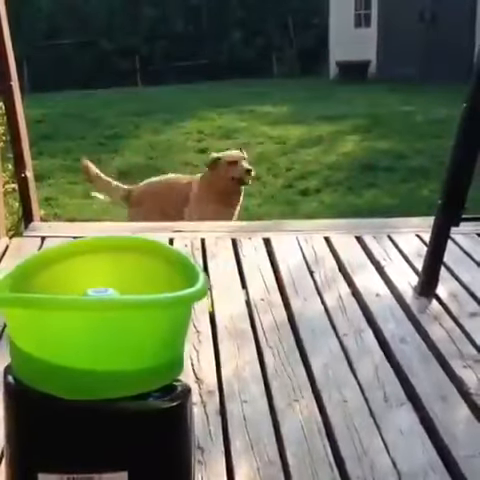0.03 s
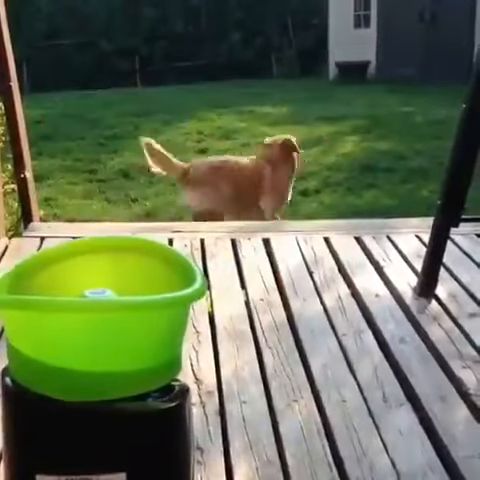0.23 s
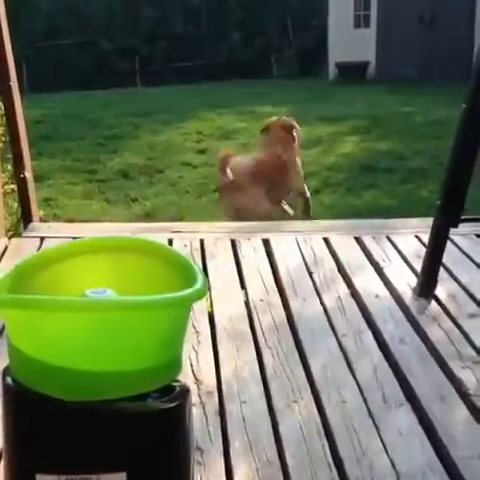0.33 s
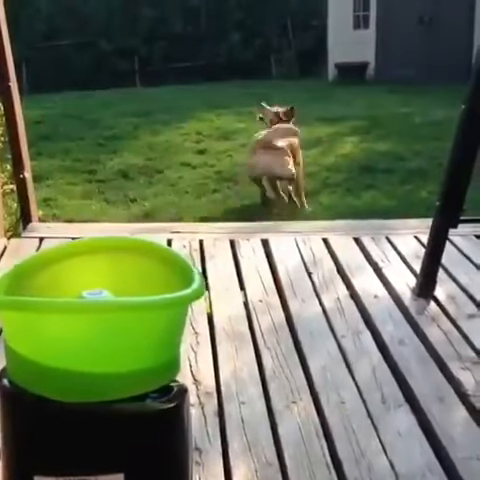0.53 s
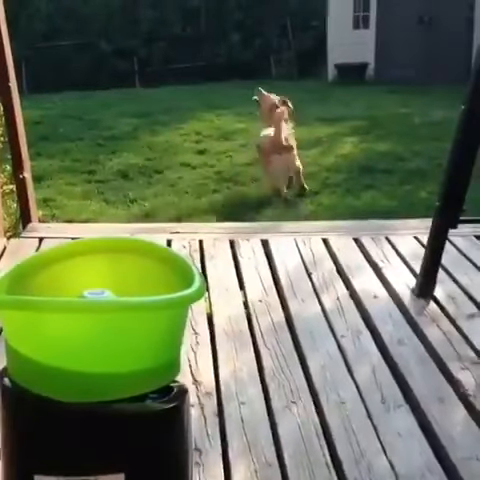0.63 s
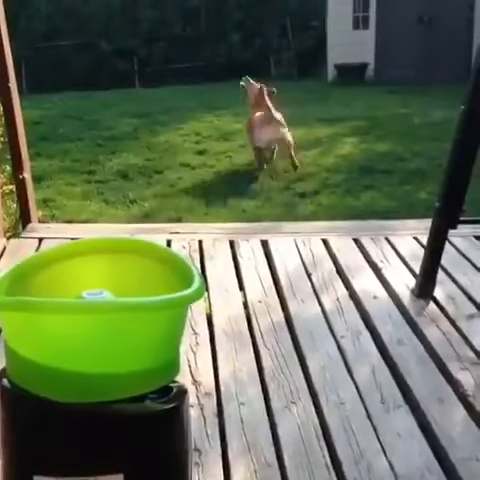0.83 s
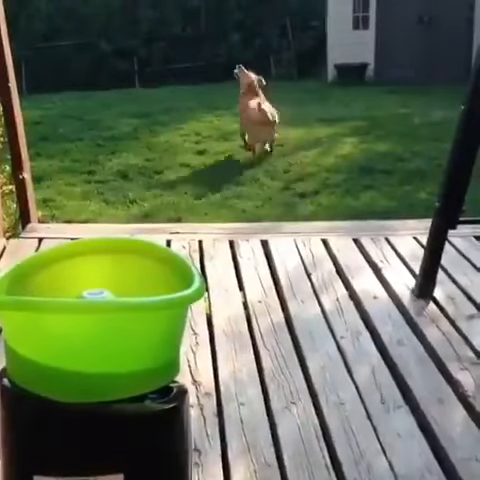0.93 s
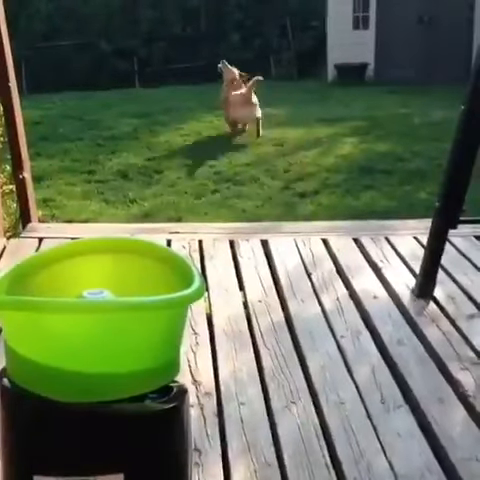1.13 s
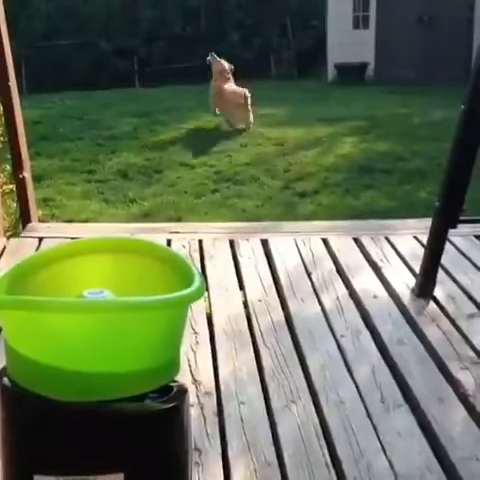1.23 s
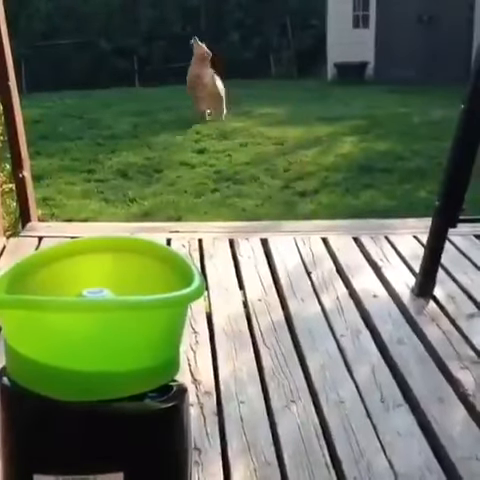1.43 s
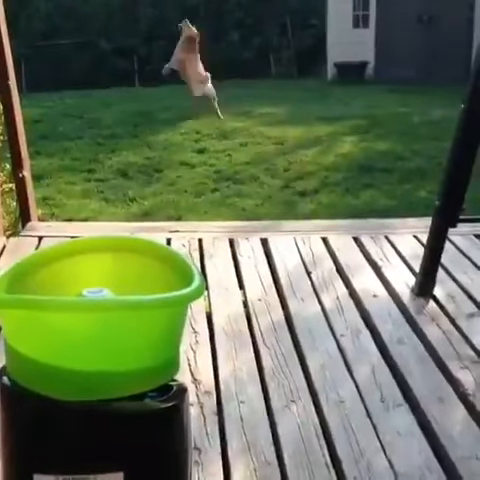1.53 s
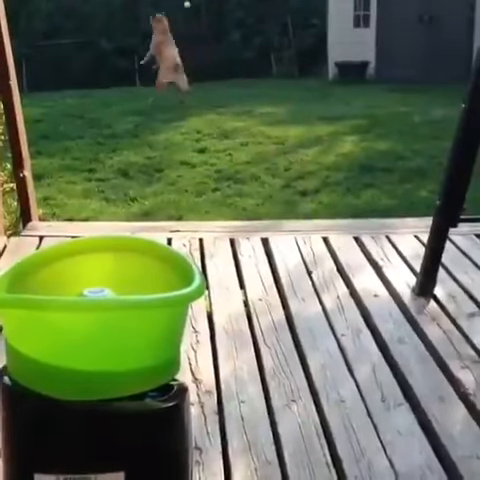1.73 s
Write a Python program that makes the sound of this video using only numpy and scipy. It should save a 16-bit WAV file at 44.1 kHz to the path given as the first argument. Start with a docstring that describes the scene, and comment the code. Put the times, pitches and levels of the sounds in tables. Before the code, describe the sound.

A ball launcher whines briefly, then fires with a loud, hollow plastic clack outdoors.

```python
"""A ball launcher on a wooden deck throws a ball for a dog in a quiet backyard.
Its motor whines as it cocks a spring; the latch slips and the striker clatters in the hollow plastic
housing, ringing the panels and booming the bucket. Deck and yard echo, the spring rings on faintly,
the mechanism rustles to rest and the dog runs off over the grass. Behind: rumble, hum, a far tone."""
import sys
import numpy as np
from scipy import signal
from scipy.fft import rfft, irfft
from scipy.io import wavfile

SR = 44100
rng = np.random.default_rng(int(sys.argv[2]) if len(sys.argv) > 2 else 0)


def file_out(sig):
    """Save sig as 16-bit WAV at sys.argv[1]."""
    # one column per channel
    cols = np.atleast_2d(sig).T
    # limit, then scale
    lim = np.clip(cols, -1, 1)
    pcm = np.round(lim * 32767).astype(np.int16)
    wavfile.write(sys.argv[1], SR, pcm)


N = 79380
T = np.arange(N) / SR

# Motor under load, then coasting. Each row: time in seconds, gear pitch in Hz, gain in dB.
MOTOR_RUN = [(0, 942, 1.5), (0.071, 936, -0.5), (.11, 952, -7.5), (0.199, 930, -12), (0.381, 833, -23),
             (.46, 728, -14), (.53, 680, -15), (0.659, 671, -16), (.74, 654, -26)]
# Gear whine. Each row: harmonic number, level in dB.
WHINE_HARMONICS = [(1, -53.5), (2, -55.5), (3, -49.5), (4, -58), (5, -58)]
# Gear rub. Each row: frequency in Hz, relative density in dB.
GEAR_SPECTRUM = [(60, -22.5), (200, 1.5), (500, -5.5), (950, 2), (1400, -5), (1900, 3), (2500, -6),
                 (5000, -1.5), (8000, -8.5), (12000, -10)]
# Outdoor rumble. Each row: frequency in Hz, relative density in dB.
YARD_SPECTRUM = [(25, -19.5), (48, 6.5), (100, -2), (130, -3), (210, -3), (280, -13), (370, -7),
                 (450, -10.5), (540, -19.5), (740, -13.5), (1000, -12.5), (1400, -16), (2600, -29.5),
                 (6600, -33.5), (12000, -36.5)]
# Background hum. Each row: frequency in Hz, level in dB.
HUM_TONES = [(119, -61), (350, -85), (452, -66.5)]
# Plastic panel clatter. Each row: frequency in Hz, relative density in dB.
CLATTER_SPECTRUM = [(30, -40), (70, -15), (130, -11), (330, -5), (800, -0.5), (1500, -0.5), (2200, -2.5),
                    (2700, -17.5), (4200, -12.5), (6500, -19.5), (11500, -22)]
# Striker blows and rebounds; only heavy ones shake the bucket.
# Each row: start in seconds, then clatter, panel ring and boom gains in dB.
STRIKER_BLOWS = [(.2162, -2.5, -5.5, -6), (.2215, -0.5, -9, -45.5), (.2278, -2.5, 3, -3),
                 (.2335, -1, -1, -36.5), (.2477, -6.5, 0, -5.5), (.2595, -6.5, -3.5, -44),
                 (.2718, -12, -15, -5), (.2835, -15, -12, -53), (.602, -65, -45, -32.5)]
# Housing panel modes. Each row: frequency in Hz, level in dB, T60 in seconds.
PANEL_MODES = [(360, -26, 0.06), (415, -24.5, 0.082), (563.2, -24, 0.19), (654.4, -25, 0.13),
               (723, -20, 0.094), (808.6, -25.5, 0.21), (851, -22, 0.1), (961, -30.5, 0.22),
               (1128, -22.5, 0.12), (1385, -28, .2), (1523, -24.5, 0.074), (1593, -38.5, 0.38),
               (1736, -21, 0.089), (2018, -31, 0.098)]
# Bucket air and wall modes. Each row: frequency in Hz, level in dB, T60 in seconds.
BUCKET_MODES = [(85.2, -41, .35), (144.3, -29.5, .38), (167.5, -24, 0.34), (197.8, -12.5, 0.14),
                (259, -25.5, 0.28)]
# Deck and yard echo. Each row: frequency in Hz, relative density in dB.
ECHO_SPECTRUM = [(100, -16), (400, -6.5), (1600, 0.5), (2600, -3.5), (4800, -5), (8000, -11.5),
                 (12000, -12)]
# Two close spring modes. Each entry: frequency in Hz.
SPRING_MODES_HZ = [3155, 3187]
# Spring ring. Each row: time in seconds, level per mode in dB.
SPRING_ENVELOPE = [(.22, -68), (.36, -63), (.58, -73.5), (.69, -66), (.81, -73.5), (0.879, -80)]
# Mechanism and grass rustles. Each row: centre in seconds, Gaussian sigma in seconds, level in dB.
RUSTLE_SWELLS = [(0.479, 0.02, -55.5), (0.529, 0.0083, -58.5), (0.572, 0.015, -55), (0.634, 0.028, -56),
                 (.92, 0.028, -61.5), (0.987, 0.03, -65), (1.271, 0.028, -65), (1.442, 0.024, -68),
                 (1.531, 0.017, -65.5), (1.681, 0.046, -72.5)]
# Rustle colour. Each row: frequency in Hz, relative density in dB.
RUSTLE_SPECTRUM = [(500, 0), (2000, 3), (3000, 1.5), (5200, 5), (8000, -2.5), (12000, -2.5)]
# Distant tone. Each row: time in seconds, pitch in Hz, level in dB.
FAR_GLIDE = [(.74, 770, -71), (.76, 799, -53), (.78, 995, -60), (.81, 1143, -62), (.83, 1160, -74)]

SHOT_S = STRIKER_BLOWS[0][0]
BINS_HZ = np.fft.rfftfreq(N, 1 / SR)


def amp(db):
    """Decibels to gain."""
    return 10 ** (np.asarray(db) / 20)


def unit(x):
    """Scale to rms 1."""
    return x / np.sqrt(np.mean(x ** 2) + 1e-20)


def noise(spectrum, ripple_db=0):
    """Coloured noise, rms 1, with optional ripple per bin."""
    hz, db = np.transpose(spectrum)
    colour = amp(np.interp(np.log(BINS_HZ + 1), np.log(hz), db) + ripple_db)
    return unit(irfft(colour * np.exp(2j * np.pi * rng.random(len(BINS_HZ))), N))


def drift(rate_hz):
    """Low-passed random wander, rms 1."""
    return unit(irfft(rfft(rng.standard_normal(N)) * np.exp(-(BINS_HZ / rate_hz) ** 2), N))


def tone(hz):
    """Sine following a pitch curve."""
    return np.sin(2 * np.pi * np.cumsum(hz) / SR)


def strike(start_s, t60_s, rise_s=1 / SR):
    """Envelope: linear rise, exponential decay."""
    age_s = np.maximum(T - start_s, 0)
    return np.minimum(age_s / rise_s, 1) * np.exp(-np.log(1000) * age_s / t60_s)


def ring(start_s, modes):
    """Damped modes struck together."""
    return sum(amp(db) * strike(start_s, t60_s, rise_s=0.00084) * np.sin(2 * np.pi * hz * (T - start_s))
               for hz, db, t60_s in modes)


def casing(depth_db=4.5, width_hz=110, corner_hz=1500):
    """Narrow treble resonances of the plastic casing, in dB per bin."""
    response = rng.standard_normal(N) * np.exp(-(T * width_hz) ** 2)
    ripple = np.tanh(unit(rfft(response).real))
    return depth_db * ripple * BINS_HZ ** 2 / (BINS_HZ ** 2 + corner_hz ** 2)


def motor_whine(shaft_hz=29, flutter_db=2):
    """Gear whine wobbles with each shaft turn and coasts down."""
    time_s, pitch_hz, gain_db = np.transpose(MOTOR_RUN)
    wobble = .012 * np.cos(2 * np.pi * shaft_hz * T)
    jitter = .01 * drift(rate_hz=120)
    hz = np.interp(T, time_s, pitch_hz) * (1 + wobble + jitter)
    whine = sum(amp(db + flutter_db * drift(shaft_hz)) * tone(round(harmonic) * hz)
                for harmonic, db in WHINE_HARMONICS)
    return whine * np.interp(T, time_s, amp(gain_db), right=0)


def gear_rub(casing_db, level_db=-49.5, fade_db_per_s=12):
    """Gears rub until the first blow."""
    return amp(level_db - fade_db_per_s * T) * noise(GEAR_SPECTRUM, casing_db) * (T < SHOT_S)


def yard(rumble_db=-53, waver_db=1, waver_hz=12.8):
    """Distant rumble and faint hum, both wavering."""
    hum = sum(amp(db) * tone(hz * (1 + 0.0083 * drift(waver_hz))) for hz, db in HUM_TONES)
    return hum + amp(rumble_db + waver_db * drift(waver_hz)) * noise(YARD_SPECTRUM)


def latch(casing_db):
    """The latch slips just ahead of the first blow."""
    envelope = amp(-27.5) * strike(start_s=0.206, t60_s=0.079, rise_s=0.0064)
    return envelope * noise(CLATTER_SPECTRUM, casing_db)


def striker(casing_db, rise_s=0.0006):
    """Blows crack, shake and ring the panels; heavy ones boom the bucket."""
    out = np.zeros(N)
    for start_s, clatter_db, ring_db, boom_db in STRIKER_BLOWS:
        crack = amp(-19.5) * strike(start_s, t60_s=0.0083, rise_s=rise_s)
        shake = amp(-14.5) * strike(start_s, t60_s=0.14, rise_s=rise_s)
        out += amp(clatter_db) * (crack + shake) * noise(CLATTER_SPECTRUM, casing_db)
        out += amp(ring_db) * ring(start_s, PANEL_MODES)
        out += amp(boom_db) * ring(start_s, BUCKET_MODES)
    return out


def echo(casing_db):
    """Diffuse tail of the shot off deck and yard."""
    return amp(-37.5) * strike(SHOT_S, t60_s=0.76) * noise(ECHO_SPECTRUM, casing_db)


def spring():
    """Two close modes beat in a thin, lingering ring."""
    time_s, db = np.transpose(SPRING_ENVELOPE)
    envelope = np.interp(T, time_s, amp(db), left=0, right=0)
    return envelope * sum(np.sin(2 * np.pi * hz * T) for hz in SPRING_MODES_HZ)


def rustles():
    """The mechanism settles, then the dog bounds off over grass."""
    swells = sum(amp(db) * np.exp(-.5 * ((T - centre_s) / sigma_s) ** 2)
                 for centre_s, sigma_s, db in RUSTLE_SWELLS)
    return swells * noise(RUSTLE_SPECTRUM)


def far_tone():
    """A faint distant tone glides upward."""
    time_s, hz, db = np.transpose(FAR_GLIDE)
    envelope = np.interp(T, time_s, amp(db), left=0, right=0)
    return envelope * tone(np.interp(T, time_s, hz))


def scene():
    """Mono mix; the casing colours gear rub, latch, clatter and echo."""
    casing_db = casing()
    motor = motor_whine() + gear_rub(casing_db)
    shot = latch(casing_db) + striker(casing_db) + echo(casing_db) + spring()
    return (motor + shot + rustles() + far_tone() + yard())[None]


def record(dry, low_cut_hz=40.7, ceiling=.72, band_limit_hz=12150):
    """Microphone: bass cut, soft peak limit, low-pass."""
    thin = signal.sosfilt(signal.butter(2, low_cut_hz, "high", fs=SR, output="sos"), dry)
    soft = thin / (1 + (thin / ceiling) ** 4) ** .25
    low_pass = signal.firwin(511, band_limit_hz, window=("kaiser", 9), fs=SR)
    return signal.oaconvolve(soft, low_pass[None], "same")


dry = scene()
out = record(dry)
file_out(out)
```